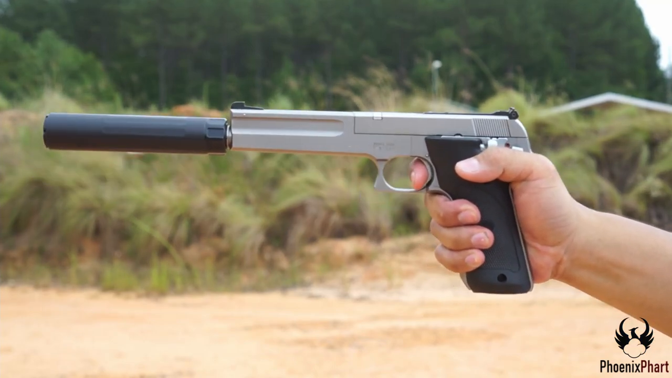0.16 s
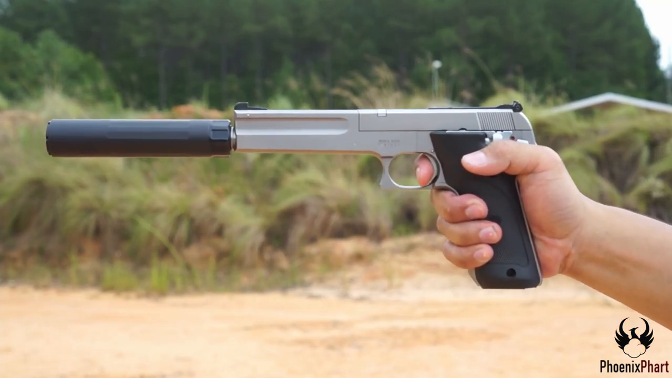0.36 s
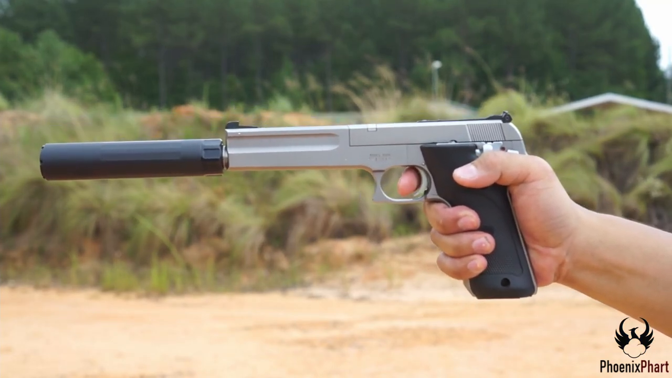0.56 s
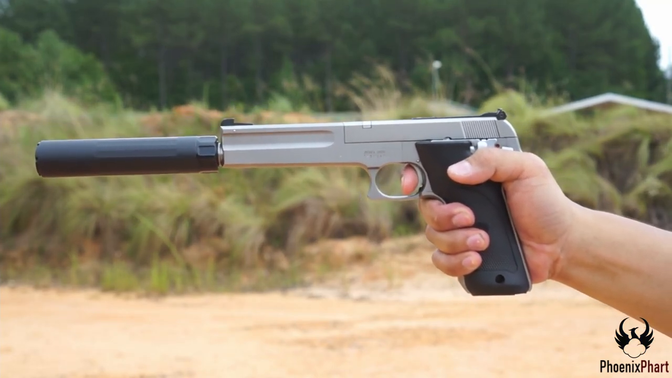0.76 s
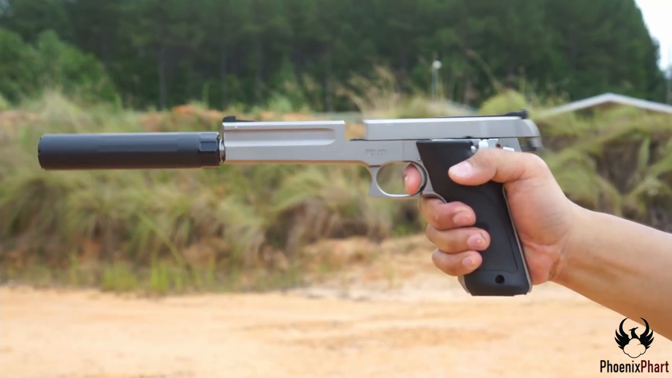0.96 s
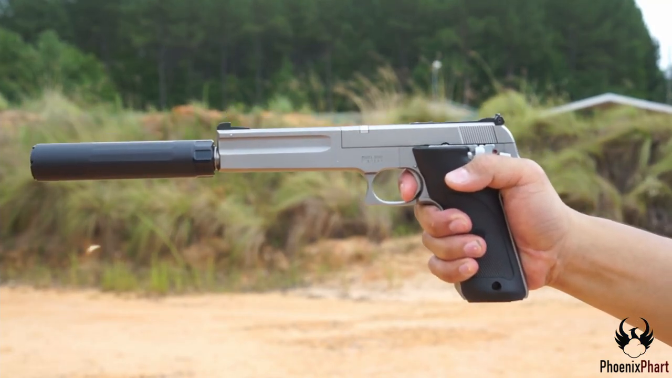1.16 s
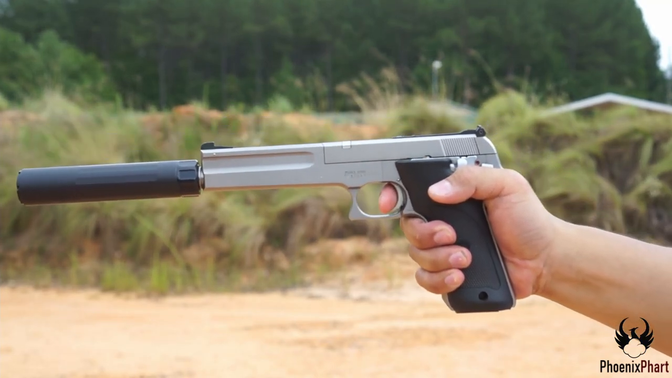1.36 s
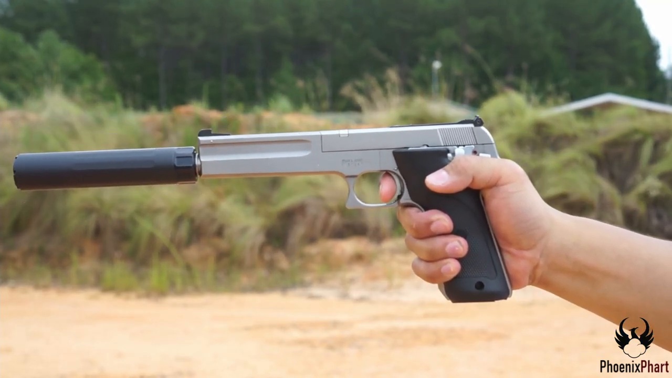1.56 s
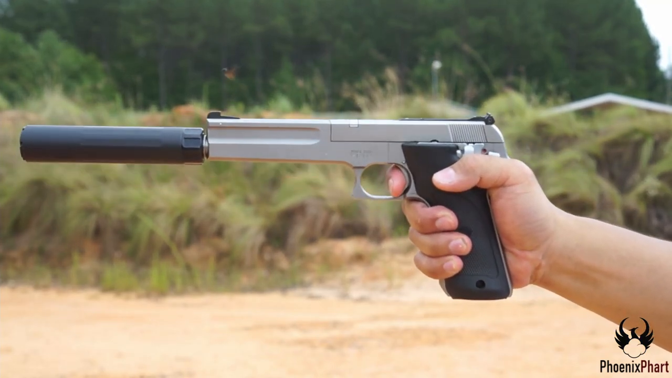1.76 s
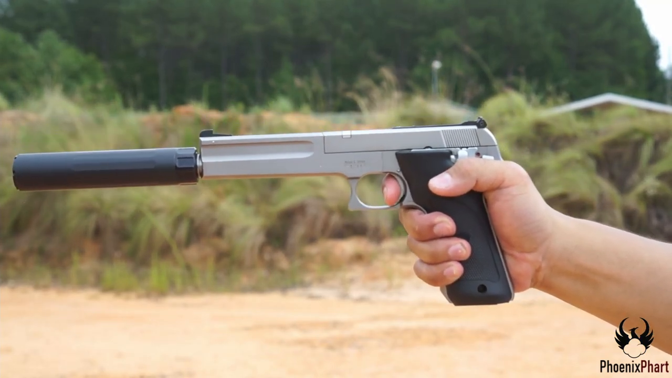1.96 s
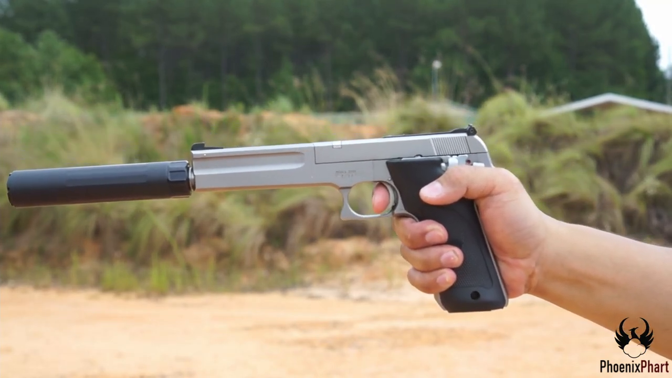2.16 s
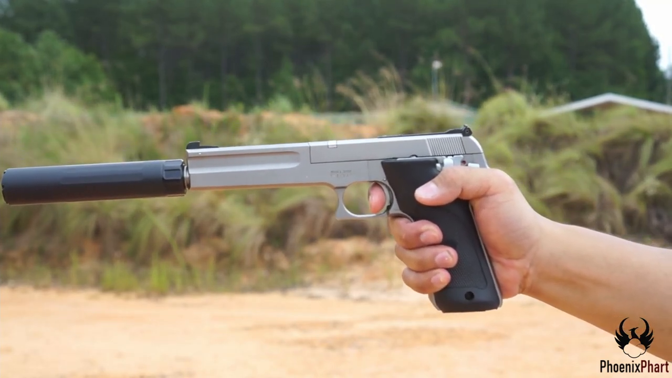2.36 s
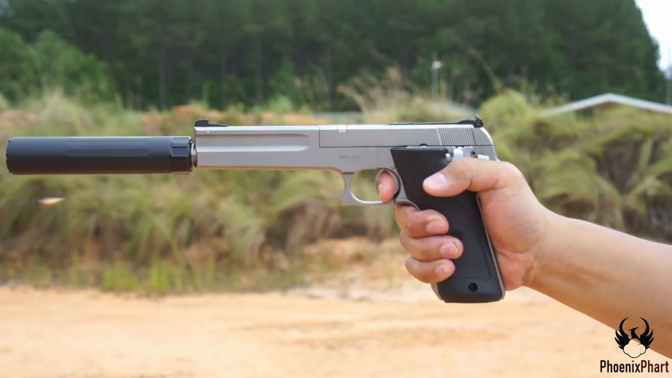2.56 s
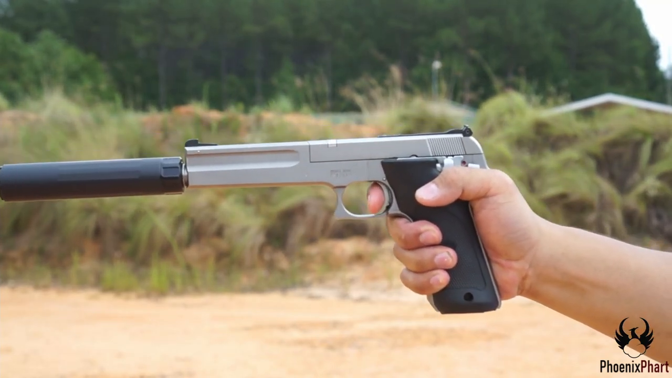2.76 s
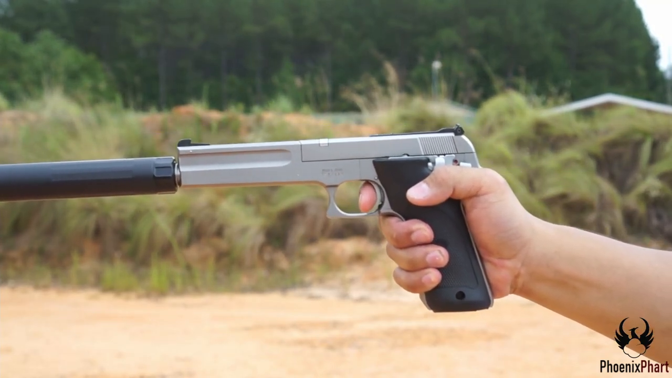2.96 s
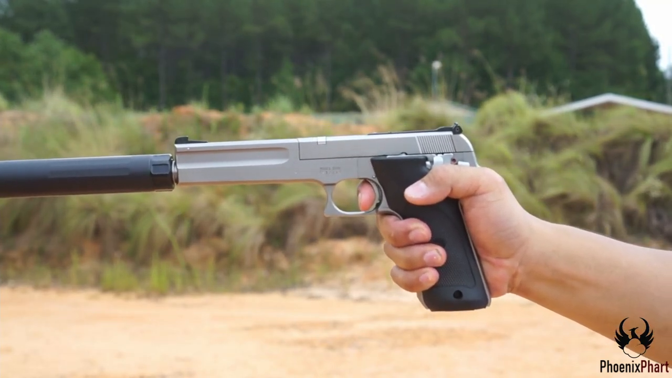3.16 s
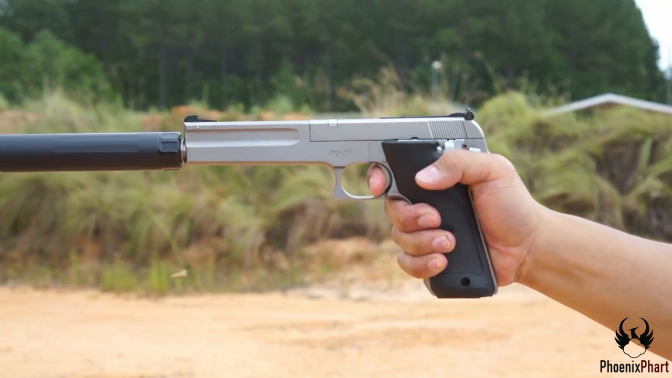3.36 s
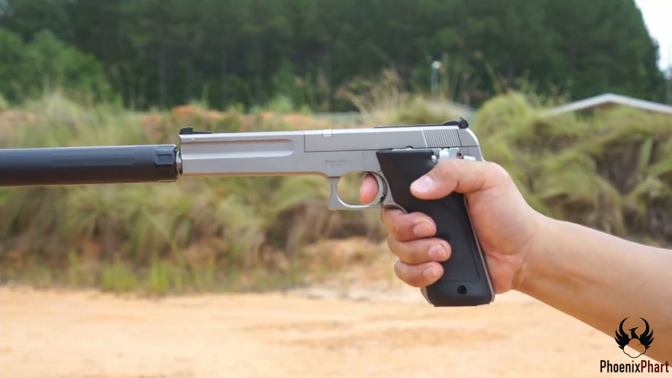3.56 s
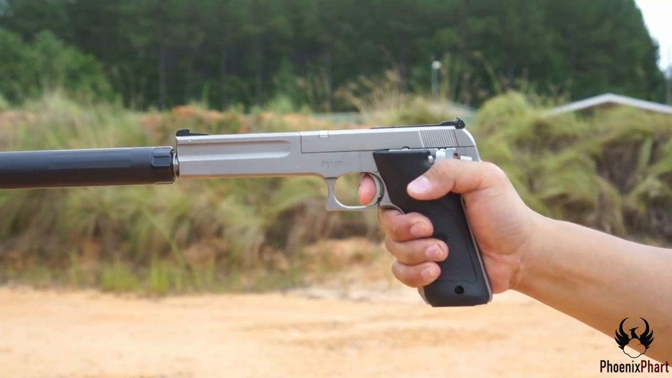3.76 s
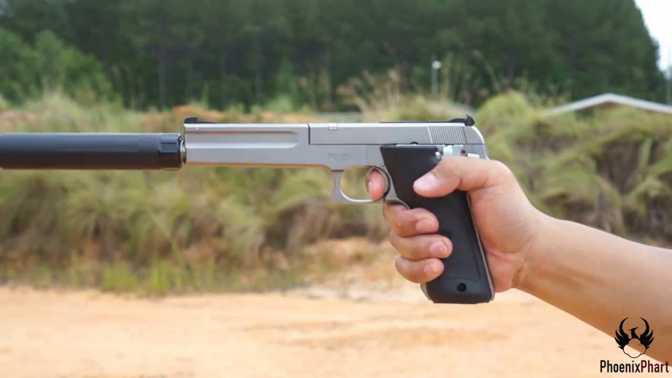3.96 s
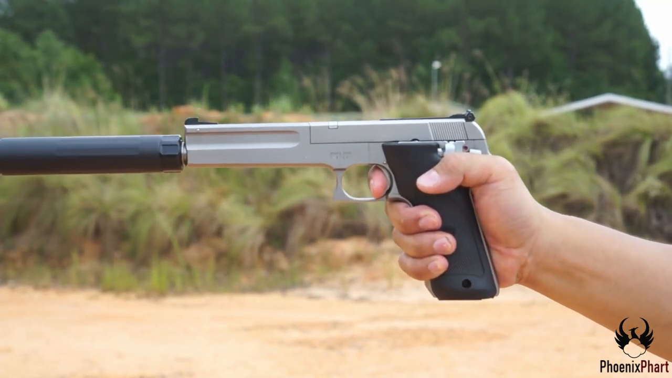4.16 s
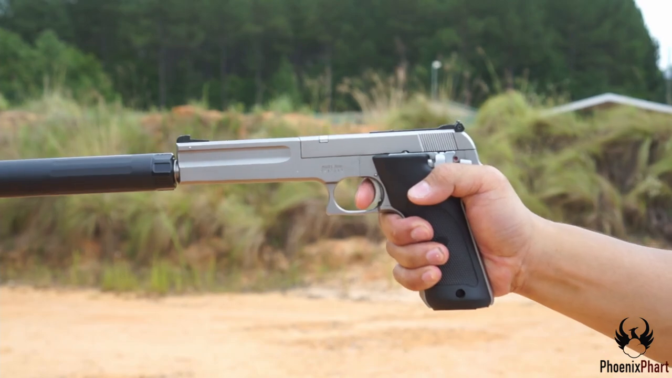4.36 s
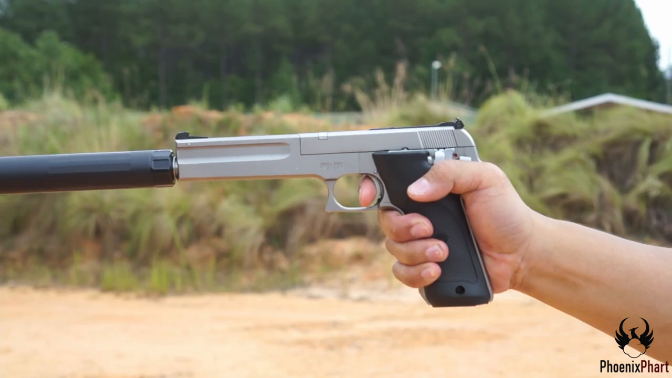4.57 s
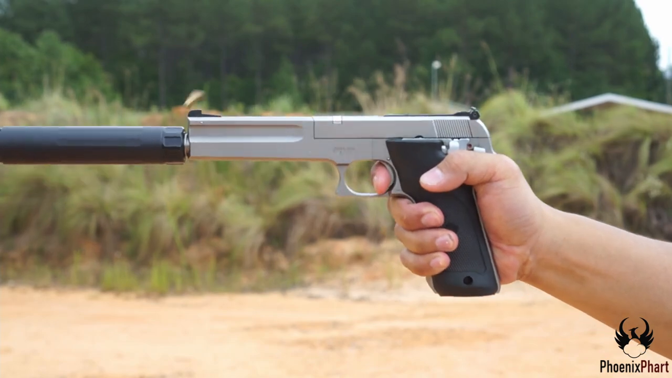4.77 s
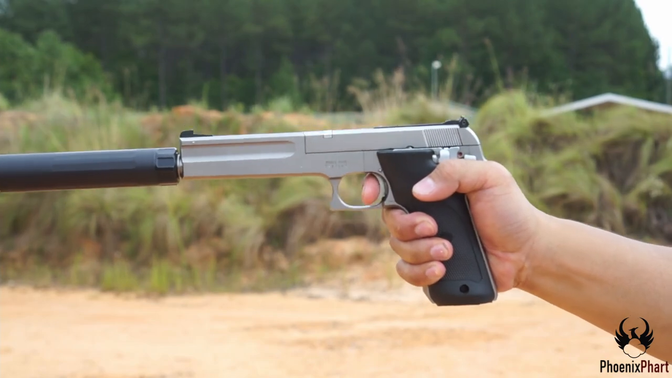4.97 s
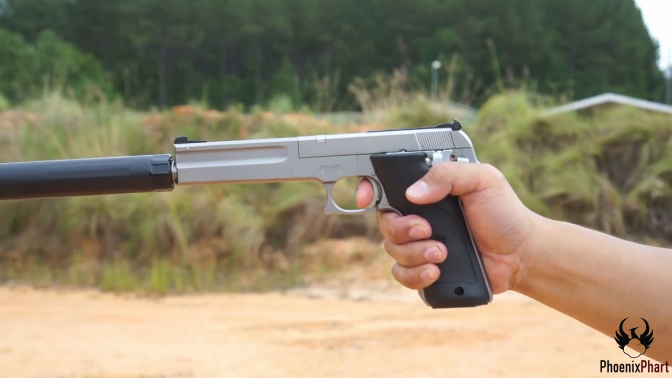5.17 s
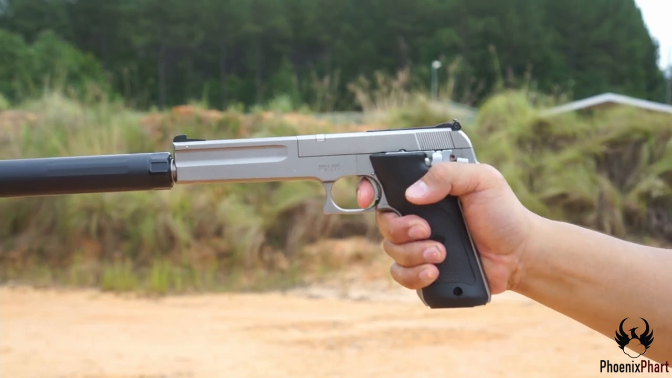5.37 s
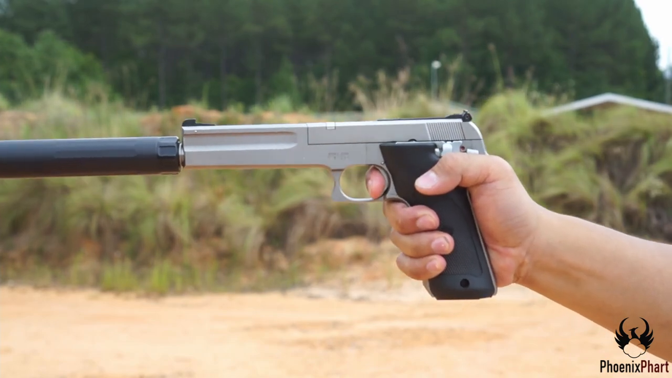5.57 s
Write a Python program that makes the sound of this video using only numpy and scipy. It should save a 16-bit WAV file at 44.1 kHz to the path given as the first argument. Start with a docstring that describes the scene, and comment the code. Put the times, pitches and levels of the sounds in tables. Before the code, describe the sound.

A suppressed small-caliber pistol fires eight close, metallic snaps outdoors, each answered by a bullet thud and soft echo, over rumbling wind.

```python
"""An outdoor range between an earth berm and a forest: a suppressed .22 pistol fires eight shots, close up.
Each shot is a hammer click, a spit of gas (shaped noise) and the slide's clack (ringing steel modes).
Bullets thud into the berm; ground, berm and forest answer with swelling clouds of noise.
Gusts rumble on the microphone, and a limiter ducks the whole mix on loud middle-range sound.
Cases, trigger clicks and small knocks tick as filtered bursts over soft air, insects and a gliding bird."""
import sys
import numpy as np
from scipy import signal
from scipy.fft import rfft, irfft, next_fast_len
from scipy.io import wavfile
from scipy.ndimage import uniform_filter1d, minimum_filter1d

SR = 44100
rng = np.random.default_rng(int(sys.argv[2]) if len(sys.argv) > 2 else 0)


def store_wav(level_fs):
    """Save 16-bit WAV to argv[1]."""
    pcm = np.round(np.clip(np.atleast_2d(level_fs), -1, 1) * 32767)
    wavfile.write(sys.argv[1], SR, pcm.T.astype(np.int16))


N = 247842
TIME = np.arange(N) / SR
LN_1000 = np.log(1000)   # a fall of 60 dB


def from_db(db):
    """Turn decibels into gain."""
    return 10 ** (np.asarray(db) / 20)


def at_hz(points, hz):
    """Read a table on a log-frequency axis."""
    f, value = np.transpose(points)
    return np.interp(np.log(np.maximum(hz, 1)), np.log(f), value)


def noise(spectrum, likeness):
    """Stereo noise of a given colour and left-right correlation; its mono mix has rms 1."""
    size = next_fast_len(N)
    hz = np.arange(size // 2 + 1) * SR / size
    alike = np.clip(at_hz(likeness, hz), -.9, 1)
    mid, side = rfft(rng.standard_normal((2, size)))
    stereo = np.sqrt(1 + alike) * mid + np.sqrt(1 - alike) * side * [[1], [-1]]
    x = irfft(from_db(at_hz(spectrum, hz)) * stereo, size)[:, :N]
    return x / x.mean(0).std()


def drift(rate):
    """A wander through random points of spread 1, `rate` points per second."""
    knots = rng.standard_normal(N // 20)
    return np.interp(TIME * rate, np.arange(len(knots)), knots)


def bursts(times, levels_db, t60):
    """An envelope that jumps up at each time and dies away within a quarter second."""
    out = np.zeros(N)
    for s, db in zip(times, levels_db):
        part = slice(int(s * SR), min(N, int(s * SR) + SR // 4))
        out[part] += from_db(db) * np.exp(-LN_1000 * (TIME[part] - TIME[part][0]) / t60)
    return out


def ring(force, hz, t60):
    """A damped mode: each unit click sets a sine of height 1 ringing."""
    r, w = np.exp(-LN_1000 / (t60 * SR)), 2 * np.pi * hz / SR
    return signal.lfilter([0, np.sin(w)], [1, -2 * r * np.cos(w), r * r], force + 1e-18)


def knock(source, s, db, hz, t60, width):
    """A short burst of the source noise through one broad resonance."""
    edges = [hz / (1 + width), min(hz * (1 + width), .45 * SR)]
    band = signal.butter(1, edges, "band", fs=SR, output="sos")
    start = int(s * SR)
    x = signal.sosfilt(band, source[:, start:start + SR // 4])
    out = np.zeros((2, N))
    out[:, start:start + x.shape[1]] = x / x.std()
    return out * bursts([s], [db], t60)


# stereo width of sound from all around: f/Hz, left-right correlation
ALL_AROUND = [(25, 0.3), (60, 0.65), (200, 0.69), (800, 0.64), (1800, 0.84), (3500, 0.39), (6000, 0),
              (14000, 0)]


def turbulence(spectrum, steady_s):
    """Low wind noise whose strength is evened out over longer stretches."""
    x = noise(spectrum, ALL_AROUND)
    return x / np.sqrt(uniform_filter1d(x.mean(0) ** 2, int(steady_s * SR)) + 0.036)


# colour of the deep buffeting, the faster flutter and the small eddies: f/Hz, relative level/dB
BUFFET_COLOUR = [(10, -10), (22, 7), (35, 7), (55, 0.5), (80, -19), (140, -38), (300, -82), (1000, -130)]
FLUTTER_COLOUR = [(30, -29.5), (55, -4), (75, 3), (110, -3.5), (160, -19.5), (230, -27), (400, -42.5),
                  (900, -57.5), (4000, -120)]
EDDY_COLOUR = [(70, -8), (125, 9.5), (180, 2), (300, -13), (500, -25), (1000, -41.5), (3000, -56),
               (12000, -100)]
# course of the gusts: t/s, relative level/dB of buffeting, of flutter, of eddies
GUSTS = [(0.0, -12, -19, -24.5), (0.402, -14, -18, -28), (0.78, -11.5, -9.0, -22), (1.05, -14, -23, -36),
         (1.251, -13.5, -16.0, -26.5), (1.421, -14.5, -25.5, -34.5), (1.548, -13, -22.0, -27),
         (2.001, -21.5, -22, -28.5), (2.36, -21.5, -33, -42), (2.522, -29.5, -41.5, -51.5),
         (2.87, -34, -51, -52), (2.999, -46.5, -47, -59.5), (3.332, -42.5, -44, -50.5),
         (3.56, -23, -41.5, -44.5), (3.921, -28.5, -35, -47.5), (4.15, -11.5, -23.5, -32.5),
         (4.319, -19.5, -30.5, -38), (4.66, -12.5, -19, -35.5), (4.82, -21.5, -43.5, -56.5),
         (5.15, -34.5, -54, -53), (5.379, -19.5, -29.5, -42.5), (5.62, -33, -58, -54)]
# which port the wind favours: t/s, left minus right level/dB (flutter follows it in part, eddies not at all)
WIND_SIDE_COURSE = [(0.0, 5.5), (.75, -0.5), (1.2, 5), (2.2, -0.5), (3.6, 7), (4.7, 7.5), (5.4, 0)]


def wind(buffet_db=0.0, flutter_db=0.0, eddy_db=-3.5, flutter_side=0.73,
         lumpy_db=1.5, eddy_lumpy_db=5.5, lumps_per_s=18):
    """Gusts buffet the microphone ports in uneven lumps and shed bursts of small eddies."""
    s, *levels = np.transpose(GUSTS)
    low_db, middle_db, high_db = [np.interp(TIME, s, db) for db in levels]
    side_db = np.interp(TIME, *np.transpose(WIND_SIDE_COURSE)) * [[.5], [-.5]]
    low_db = low_db + buffet_db + side_db + lumpy_db * drift(lumps_per_s)
    middle_db = middle_db + flutter_db + flutter_side * side_db + lumpy_db * drift(lumps_per_s)
    high_db = high_db + eddy_db + eddy_lumpy_db * drift(28)
    buffet = turbulence(BUFFET_COLOUR, steady_s=0.065) * from_db(low_db)
    flutter = turbulence(FLUTTER_COLOUR, steady_s=0.13) * from_db(middle_db)
    return buffet + flutter + noise(EDDY_COLOUR, ALL_AROUND) * from_db(high_db)


# colour of the air in the trees: f/Hz, relative level/dB
AIR_COLOUR = [(30, 19), (150, 0), (400, 4.5), (1200, -0.5), (2500, -6.5), (5000, -6.5), (6200, -14.5),
              (8000, -10.5), (16000, -18.5)]


def air_and_insects(air_db=-54.0, insect_db=-70.0):
    """Soft broadband air in the trees under a slowly wavering band of insect noise."""
    air = from_db(air_db) * noise(AIR_COLOUR, ALL_AROUND)
    insects = noise([(4800, -29.5), (5900, -7.0), (6500, -7.5), (7600, -33.0)], ALL_AROUND)
    return air + from_db(insect_db + 3.3 * drift(3.9)) * insects


# stereo width of sound from one far spot: f/Hz, left-right correlation
FAR_SPOT = [(100, 0.5), (500, 0.87), (2000, 0.89), (6000, 0.69), (14000, 0.69)]


def contact_noise():
    """Rough noise that excites the light contacts."""
    return noise([(300, -13.5), (1300, 8), (6000, -2.5), (16000, -7.5)], FAR_SPOT)


# small dry knocks: t/s, level/dB, centre f/Hz, t60/s
SMALL_KNOCKS = [(0.113, -23, 1910, 0.029), (0.112, -26.5, 6000, 0.039), (0.5605, -28, 6050, 0.1),
                (0.565, -28.5, 1590, 0.082), (0.757, -35, 1190, 0.0077), (1.2953, -30.5, 5080, 0.026),
                (3.0083, -31, 4260, 0.027), (3.091, -42, 5870, 0.017)]


def knocks(width=0.46):
    """Small dry knocks, each a noise burst through its own broad resonance."""
    source = contact_noise()
    return sum(knock(source, s, db, hz, t60, width) for s, db, hz, t60 in SMALL_KNOCKS)


# stereo width of sound from close ahead: f/Hz, left-right correlation
CLOSE_AHEAD = [(100, 0.92), (600, 0.99), (2000, 1), (4000, 1), (8000, 0.86), (14000, 0.54)]
# colour of the slide's contact noise, also of the grit spray: f/Hz, relative level/dB
CLACK_COLOUR = [(200, -23), (900, -28), (2000, -0.5), (4200, 2), (6600, 6), (9000, 1.5), (12000, -10),
                (16000, -13.5)]
# ringing modes of slide and frame: f/Hz, relative level/dB, t60/s
STEEL_MODES = [(2300, -10, 0.04), (2537, -15, 0.047), (3130, -19.5, 0.044), (3800, -7.5, 0.03),
               (4320, -11.5, 0.034), (4920, -18, .035), (5520, -24, .035), (5800, -15.5, 0.024),
               (6350, 1, 0.021), (7960, -1, 0.046), (9100, -13, 0.004), (10750, -26, 0.037),
               (13790, -16.5, .025)]
# how the rear stop reweights those modes against the closing slide: f/Hz, extra level/dB
REAR_STOP_TILT = [(2250, -12.5), (4350, -2), (6520, -11.5), (7940, -16.5), (9400, 12), (14010, 6)]
HAMMER_LEAD_S, REBOUND_LAG_S = .0055, .0132   # before the shot; after the slide closes
RASP_DB, RASP_T60_S = -27, .12


def action(fired, rear, closed, rear_db, close_db, scatter_db=1.0, spread=.25):
    """Hammer, rear stop, closing slide and its rebound all strike the same ringing steel."""
    times = np.concatenate([fired - HAMMER_LEAD_S, rear, closed, closed + REBOUND_LAG_S])
    hammer_db = np.full(len(fired), -23.0)
    levels = np.concatenate([hammer_db, rear_db - 2, close_db + .5, close_db - 29.0])
    at_stop = np.repeat([0, 1, 0, 0], len(fired))
    contact = uniform_filter1d(bursts(times, levels - 3, t60=0.0095), SR // 2000)
    sliding = bursts(rear, rear_db + RASP_DB, t60=RASP_T60_S)   # the slide rasps along its rails
    out = noise(CLACK_COLOUR, CLOSE_AHEAD) * (contact + sliding)
    for hz, db, t60 in STEEL_MODES:
        tilt_db = at_stop * at_hz(REAR_STOP_TILT, hz)
        scatter = scatter_db * rng.standard_normal(len(times))
        strength = from_db(levels + db - 8.5 + tilt_db + scatter)
        # each mode radiates unevenly to the two sides
        sides = 1 + spread * rng.uniform(-0.75, 1, len(times)) * [[1], [-1]]
        force = np.zeros((2, N))
        force[:, (times * SR).astype(int)] = strength * rng.choice([-1, 1], len(times)) * sides
        out += ring(force, hz, t60)
    return out


# colour of the crack, the dull puff and the whistling jet: f/Hz, relative level/dB
CRACK_COLOUR = [(100, -6.5), (300, -4.5), (1100, -3), (1900, -11), (3000, -0.5), (6200, -0.5), (9000, -5),
                (12000, -11), (16000, -24.5)]
PUFF_COLOUR = [(80, 16.5), (200, -1), (600, -7), (1100, -15.5), (1600, -13), (2200, -35.5), (6000, -7)]
JET_COLOUR = [(500, -9.5), (3000, -13.5), (5400, -24.5), (6000, 2.5), (6600, -2), (7200, -13),
              (11000, -11.5), (16000, -29.5)]
# the suppressor's chambers, rung by the gas: f/Hz, relative level/dB, t60/s
CHAMBER_MODES = [(515, -23.5, .03), (678, -29, 0.056), (1114, -13.5, 0.027), (1453, -17, 0.025),
                 (1820, -35, 0.024), (6000, -22.5, 0.011)]
PUFF_LAG_S, JET_LAG_S = .0021, .0034   # after the shot


def report(fired, crack_db, gas_db, ring_db):
    """The cartridge cracks, then gas leaves as a puff and a jet and rings the suppressor's chambers."""
    crack_level = bursts(fired, crack_db - 7, t60=0.0084) + bursts(fired, crack_db - 11.5, t60=0.14)
    crack = noise(CRACK_COLOUR, CLOSE_AHEAD) * crack_level
    puff = noise(PUFF_COLOUR, CLOSE_AHEAD) * bursts(fired + PUFF_LAG_S, gas_db - 20.5, t60=0.011)
    jet_level = uniform_filter1d(bursts(fired + JET_LAG_S, gas_db + 0.5, t60=0.013), SR // 1500)
    jet = noise(JET_COLOUR, CLOSE_AHEAD) * jet_level
    force = np.zeros(N)
    hits = ((fired + PUFF_LAG_S) * SR).astype(int)
    for hz, db, t60 in CHAMBER_MODES:
        strength = from_db(ring_db + db + rng.standard_normal(len(fired)))
        force[hits] = strength * rng.choice([-1, 1], len(fired))
        puff = puff + ring(force, hz, t60)
    return crack + puff + jet


def stop_ping(rear, rear_db, ping_db=-5.0, hold_s=0.0087, linger_db=-53.5):
    """The rear stop rings on one clear note, which the returning slide soon damps to a faint trace."""
    out = np.zeros((2, N))
    after = np.arange(SR // 8) / SR
    early = np.array([[0], [5e-6]])   # it reaches the right port a trace sooner (s)
    note = np.sin(2 * np.pi * 7940 * (after + early))
    damped = from_db(ping_db) * np.exp(-(after / hold_s) ** 2)
    level = damped + from_db(linger_db) * (1 - after / after[-1])
    for s, db in zip(rear, rear_db):
        start = int(s * SR)
        out[:, start:start + len(after)] += from_db(db) * level * note
    return out


def echo(fired, levels_db, groups, spectrum, likeness, grain_db, ripple_db):
    """Countless small reflections: groups swell, hold and die, clumped in time, coloured anew per shot."""
    size = next_fast_len(SR)
    after, hz = TIME[:size], np.arange(size // 2 + 1) * SR / size
    power = 0
    for delay, rise, hold, db, t60 in groups:
        swell = np.clip((after - delay) / rise, 0, 1)
        dying = np.exp(-LN_1000 * np.maximum(after - delay - rise - hold, 0) / t60)
        power = power + (from_db(db) * swell * dying) ** 2
    scatter = noise(spectrum, likeness) * from_db(grain_db * drift(700))
    out = np.zeros((2, N))
    for s, gain_db in zip(fired, levels_db):
        start = int(s * SR)
        part = slice(start, start + size)
        wobble = np.interp(np.sqrt(hz), np.linspace(0, 150, 70), rng.standard_normal(70))
        coloured = irfft(rfft(scatter[:, part], size) * from_db(ripple_db * wobble), size)
        out[:, part] += (from_db(gain_db) * np.sqrt(power) * coloured)[:, :N - start]
    return out


# reflections from the ground: delay t/s, rise t/s, hold t/s, relative level/dB, t60/s
GROUND_GROUPS = [(0.012, .006, 0.0094, -13.5, 0.082), (0.033, 0.016, .02, -30.5, .3),
                 (.08, .05, .1, -53, .9)]
# their colour: f/Hz, relative level/dB
GROUND_COLOUR = [(150, -22.5), (800, -8.5), (2000, -2.5), (4000, -0.5), (6500, 2.5), (8000, -1.5),
                 (10000, -7), (16000, -19.5)]


def ground_echo(fired, crack_db):
    """The ground scatters the shot at once, following half of the crack's level in dB."""
    return echo(fired, crack_db / 2, GROUND_GROUPS, GROUND_COLOUR, ALL_AROUND, grain_db=3.5, ripple_db=0.5)


# swells of the first shot's wash: delay t/s, rise t/s, hold t/s, relative level/dB, t60/s
WASH_GROUPS = [(0.037, 0.04, 0.012, -28, 0.046), (.19, 0.045, 0.026, -47, 0.95)]
# its colour: f/Hz, relative level/dB
WASH_COLOUR = [(1500, -32.5), (4000, -11), (5000, 3), (5600, -3), (6500, 4.5), (8500, -6.5), (11000, -11.5),
               (16000, -22.5)]


def first_wash(fired):
    """The first shot burns the air in the suppressor and leaves a brighter wash."""
    return echo(fired[:1], [0], WASH_GROUPS, WASH_COLOUR, ALL_AROUND, grain_db=1, ripple_db=1)


# reflections from the berm: delay t/s, rise t/s, hold t/s, relative level/dB, t60/s
BERM_GROUPS = [(.101, 0.0016, .003, -28.5, 0.027), (.108, .014, 0.0067, -30, 0.1),
               (.12, 0.021, .022, -39.5, 0.071)]
# their colour: f/Hz, relative level/dB
BERM_COLOUR = [(100, -13), (300, -8), (550, -1.5), (1300, 0.5), (2800, 4), (4500, -2.5), (7000, -6.5),
               (11000, -13.5), (16000, -26)]


def berm_echo(fired, echo_db):
    """The earth berm downrange throws each shot back as a clumped cloud of reflections."""
    return echo(fired, echo_db, BERM_GROUPS, BERM_COLOUR, FAR_SPOT, grain_db=4.5, ripple_db=4.0)


# bullets striking the earth: t/s, relative level/dB, pitch of the thud f/Hz
BULLET_HITS = [(0.274, -12, 1228), (1.107, -17.5, 604), (1.864, -13, 480), (2.628, -14.5, 350.6),
               (3.361, -17, 1500), (4.1, -19, 1470), (4.84, -9, 1386), (5.583, -9.5, 550)]


def impacts(thud_db=-5.5, spray_db=-22.5):
    """The bullet thuds into sand with a slap and throws up a spray of grit."""
    earth = noise([(100, -19), (300, 6.5), (1500, -14), (5000, -20), (16000, -24)], FAR_SPOT)
    thuds = sum(knock(earth, s, db + thud_db, hz, t60=0.042, width=0.094) for s, db, hz in BULLET_HITS)
    s, db, hz = np.transpose(BULLET_HITS)
    slap = earth * bursts(s, db - 8.5, t60=0.014)
    grit = noise(CLACK_COLOUR, FAR_SPOT) * from_db(1.2 * drift(720))
    return thuds + slap + grit * bursts(s, db + spray_db, t60=0.015)


# reflections from the trees: delay t/s, rise t/s, hold t/s, relative level/dB, t60/s
FOREST_GROUPS = [(0.181, 0.023, 0.036, -43.5, .55)]
# their colour: f/Hz, relative level/dB
FOREST_COLOUR = [(150, -19.5), (500, -8.5), (900, -3), (1600, 1.5), (3200, 6), (6200, 0.5), (8200, -2.5),
                 (11000, -21), (16000, -27)]
FOREST_FOLLOWS = 0.62   # dB of forest echo per dB of berm echo


def forest_echo(fired, echo_db):
    """The trees behind the berm answer later and longer, from all around."""
    levels_db = FOREST_FOLLOWS * echo_db
    return echo(fired, levels_db, FOREST_GROUPS, FOREST_COLOUR, ALL_AROUND, grain_db=2.0, ripple_db=1.0)


# spent cases landing about 0.3 s after a shot: t/s, level/dB
CASE_LANDINGS = [(.458, -26.5), (1.277, -33), (2.040, -29.5), (2.808, -30), (3.506, -30), (4.2783, -31.5),
                 (5.012, -32.5)]
CASE_HZ, CASE_T60_S = 6660, 0.014


def falling_cases():
    """Spent cases land as short bright noise bursts."""
    source = contact_noise()
    return sum(knock(source, s, db, CASE_HZ, CASE_T60_S, width=0.33) for s, db in CASE_LANDINGS)


# trigger clicks between shots: t/s, level/dB
TRIGGER_CLICKS = [(.877, -57.5), (1.607, -27), (3.1115, -34), (3.828, -29), (5.396, -27.5)]
TRIGGER_HZ, TRIGGER_T60_S = 3900, 0.0073
SPRING_HZ, SPRING_DB, SPRING_T60_S = 12500, -19.0, .048   # level is relative to the click


def trigger():
    """The trigger clicks as a resonant noise burst and its spring pings as a decaying sine."""
    source = contact_noise()
    clicks = sum(knock(source, s, db, TRIGGER_HZ, TRIGGER_T60_S, width=0.3) for s, db in TRIGGER_CLICKS)
    s, db = np.transpose(TRIGGER_CLICKS)
    ping = np.sin(2 * np.pi * SPRING_HZ * TIME) * bursts(s, db + SPRING_DB, SPRING_T60_S)
    return clicks + ping


# a far bird's notes: t/s, length t/s, from f/Hz, to f/Hz, relative level/dB
BIRD_NOTES = [(1.516, .07, 3520, 3370, -67), (1.67, 0.06, 4900, 3920, -52),
              (2.98, 0.052, 4660, 4450, -45.5), (3.718, 0.043, 4300, 3780, -61),
              (3.87, 0.13, 4740, 3600, -55.5)]


def bird(bird_db=-3.5):
    """A far bird's gliding sine notes swell and fade with a jittery pitch."""
    out = np.zeros(N)
    for s, length, from_hz, to_hz, db in BIRD_NOTES:
        part = np.clip((TIME - s) / length, 0, 1)
        hz = from_hz + (to_hz - from_hz) * part + 130 * drift(430)
        out += from_db(db + bird_db) * np.sin(np.pi * part) * np.sin(2 * np.pi * np.cumsum(hz) / SR)
    return out


# the shots: fired t/s, slide cycle t/s, then relative level/dB of crack, gas, suppressor ring,
# rear stop, its clear note, closing slide, echo from downrange
SHOT_LIST = [(0.1383, .0232, 0.5, 5, 4, 2, 4, 2, -8.5), (.9820, 0.032, -6.5, -5, -13.5, 4, 4, -2, -2.5),
             (1.7399, 0.022, -4.5, 3.5, 7, 2.5, 4, 2, -9), (2.5065, 0.027, -8, -4, -21, 3.5, 3.5, -3, -1),
             (3.2397, .0240, -4, 0.5, 4, 2.5, 2.5, -4.5, 4.5),
             (3.9779, .0203, 0, 3.5, -6.5, 5.5, 10, -2, 2.5),
             (4.7179, 0.027, -5.5, -7.5, -6, 3.5, 1, -6, 8),
             (5.4605, 0.024, -4.5, -2.5, 5.5, 7, 5.5, -2.5, 0.5)]
REAR_SHARE = .275   # part of the cycle that has passed when the slide hits its rear stop
PISTOL_DB = 12
BERM_LAG = 2   # samples by which the left port hears the berm first


def scene():
    """Mix the pistol, the range's answer, the small contacts and the weather."""
    columns = np.transpose(SHOT_LIST)
    fired, cycle, crack_db, gas_db, ring_db, rear_db, note_db, close_db, echo_db = columns
    rear, closed = fired + REAR_SHARE * cycle, fired + cycle
    weather = wind() + air_and_insects() + bird()
    contacts = knocks() + falling_cases() + trigger()
    pistol = action(fired, rear, closed, rear_db, close_db)
    pistol = pistol + report(fired, crack_db, gas_db, ring_db) + stop_ping(rear, note_db)
    left, right = berm_echo(fired, echo_db) + impacts()
    berm = np.array([left, np.pad(right, (BERM_LAG, 0))[:N]])   # the berm lies to the left
    answer = ground_echo(fired, crack_db) + first_wash(fired) + berm + forest_echo(fired, echo_db)
    return from_db(PISTOL_DB) * pistol + answer + contacts + weather


CUTOFF_HZ = 15800


def record(dry, limit_db=-18.0, squeeze=0.74, ahead_s=.004, hold_s=0.031, release_db_per_s=209.5):
    """A limiter ducks loud moments, holds and recovers; peaks are rounded and the top is cut."""
    # the detector listens to the middle range
    middle = signal.butter(2, [300, 5500], "band", fs=SR, output="sos")
    sensed = signal.sosfilt(middle, dry)
    power = uniform_filter1d(np.mean(sensed ** 2, 0), SR // 250)
    over_db = squeeze * np.maximum(10 * np.log10(np.abs(power) + 1e-12) - limit_db, 0)
    widest_db = -minimum_filter1d(-over_db, int(hold_s * SR))
    held_db = np.interp(TIME + ahead_s - hold_s / 2, TIME, widest_db)
    release_db = release_db_per_s * TIME
    duck_db = np.maximum.accumulate(held_db + release_db) - release_db
    x = dry * from_db(-uniform_filter1d(duck_db, SR // 500))
    x = x * np.minimum(TIME / .004, 1)   # 4 ms fade-in
    x = x / (1 + x ** 6) ** (1 / 6)   # rounds the peaks
    return signal.sosfilt(signal.ellip(12, .1, 70, CUTOFF_HZ, fs=SR, output="sos"), x)


dry = scene()
out = record(dry)
store_wav(out)
```